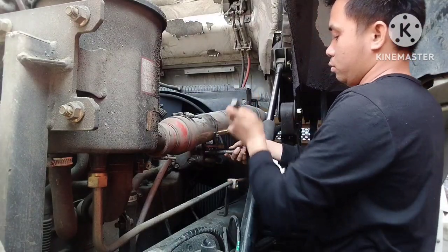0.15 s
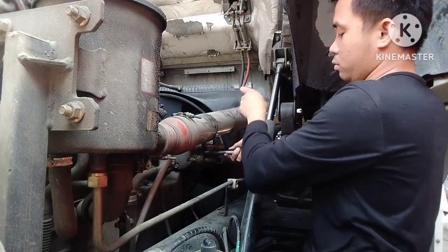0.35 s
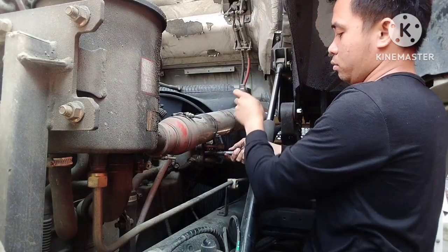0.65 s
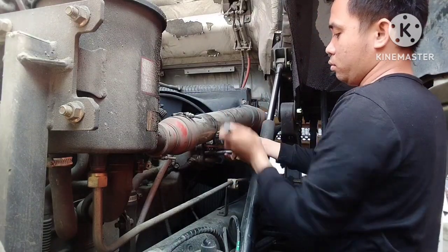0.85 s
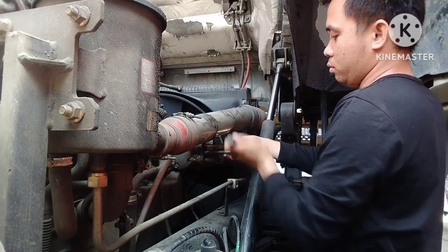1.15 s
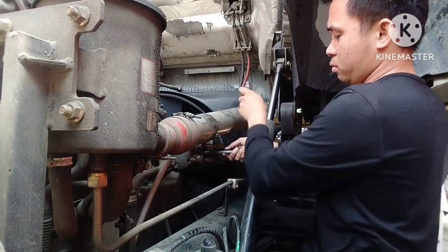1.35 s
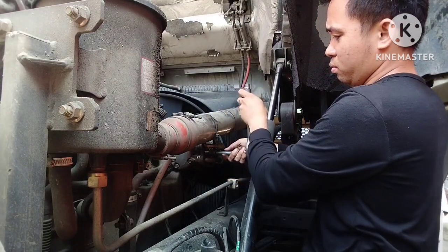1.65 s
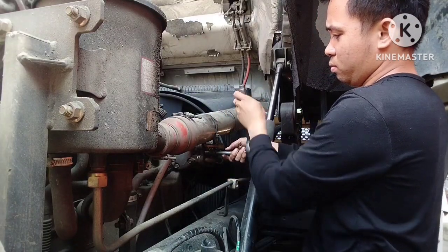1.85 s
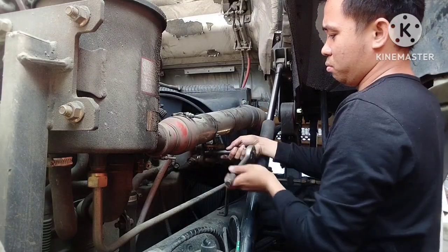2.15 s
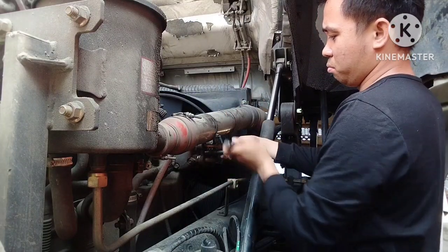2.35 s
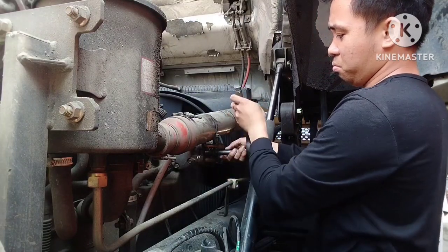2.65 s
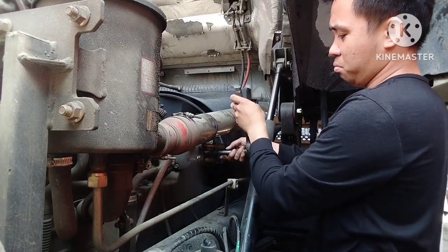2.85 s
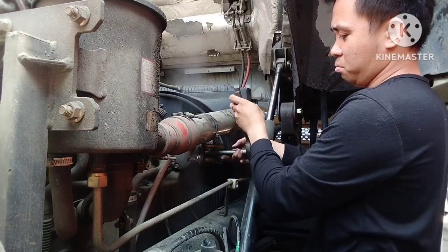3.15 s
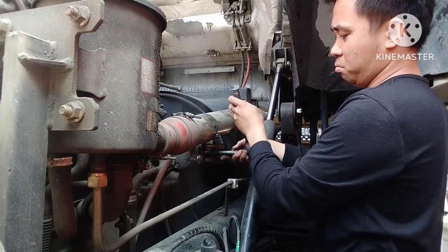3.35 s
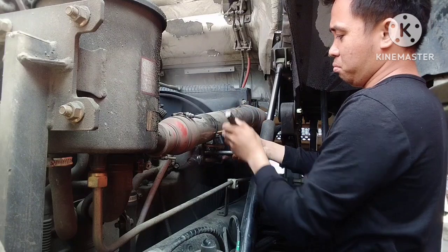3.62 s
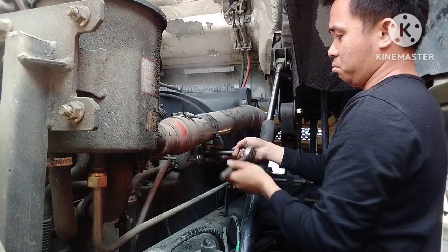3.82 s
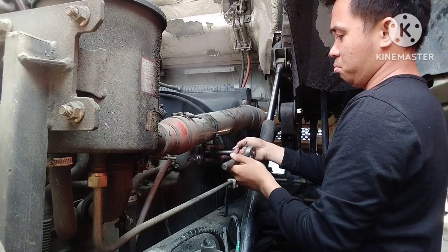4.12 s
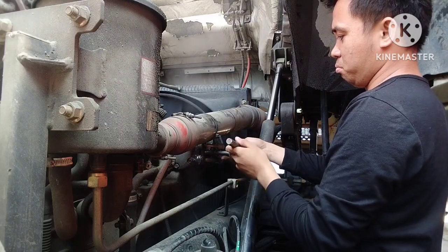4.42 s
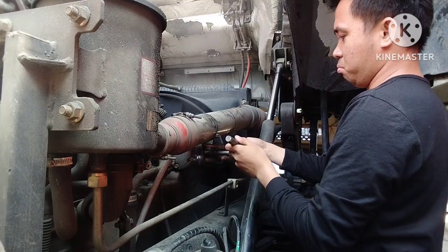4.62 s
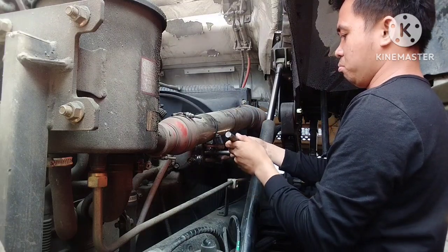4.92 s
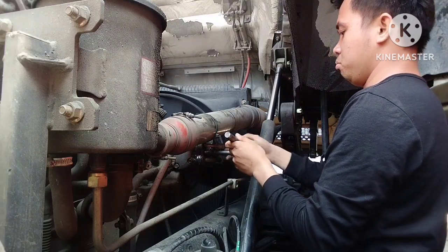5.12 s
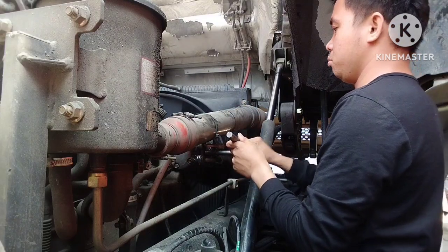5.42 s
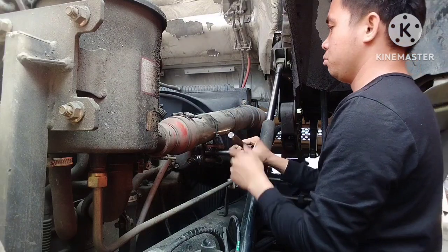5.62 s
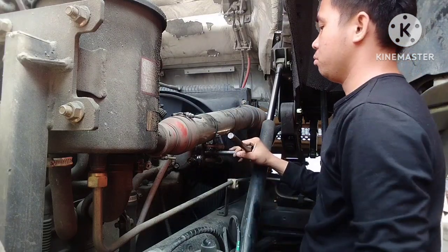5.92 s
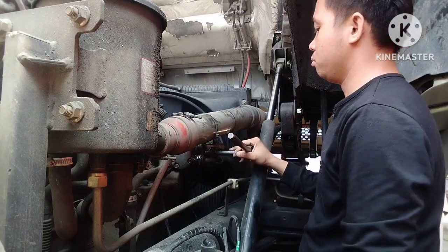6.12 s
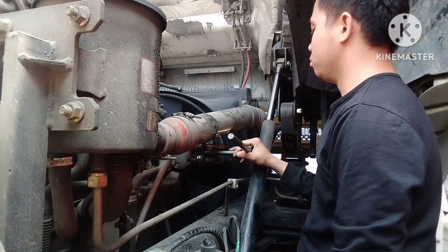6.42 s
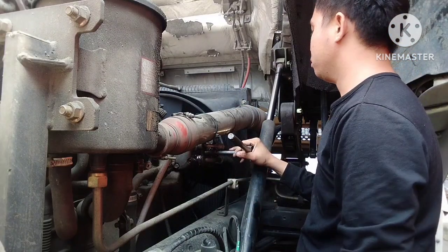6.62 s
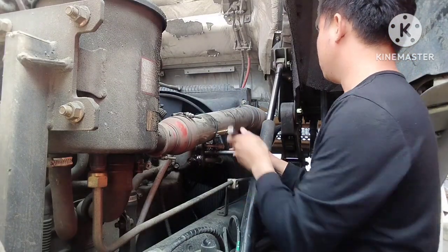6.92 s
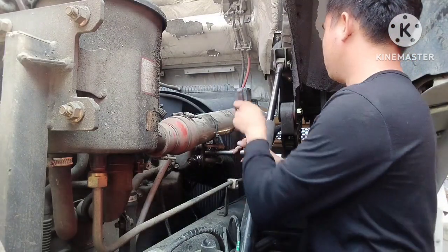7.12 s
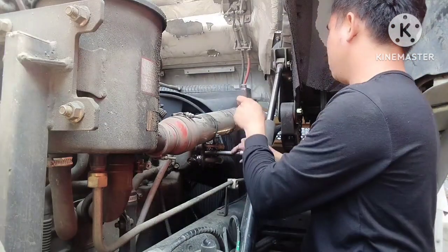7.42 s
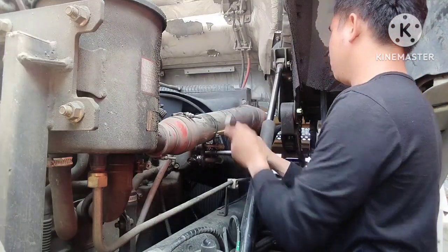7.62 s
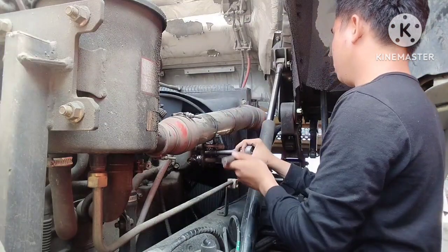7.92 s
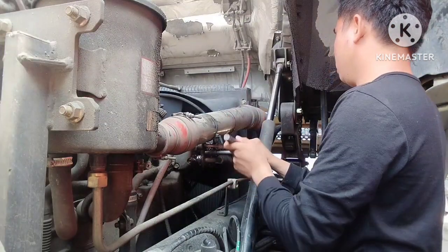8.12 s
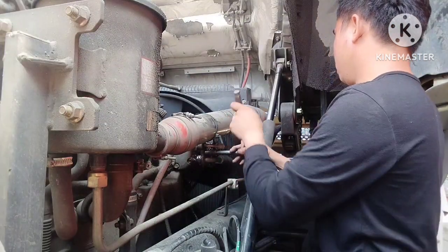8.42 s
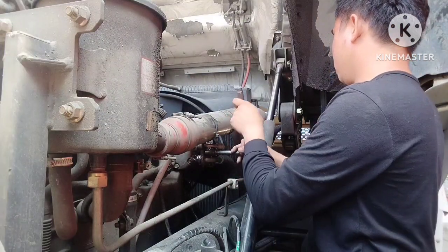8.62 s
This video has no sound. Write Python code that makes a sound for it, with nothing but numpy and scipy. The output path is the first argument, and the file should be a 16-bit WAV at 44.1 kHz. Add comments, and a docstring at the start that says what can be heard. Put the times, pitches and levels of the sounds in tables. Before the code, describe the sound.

A brief puff of escaping gas, a quick run of metallic ratchet clicks, then a loud steady pressurised hiss that lasts to the end.

```python
"""Faint pings and two faint clicks come first, over the low rumble and thin wash of a workshop.
A mechanic loosens a fitting on a vehicle's air conditioning line: a short puff of gas escapes,
a ratchet clicks back, then the gas jet hisses on, loud and steady. The jet is noise coloured mostly by
pipes and hollows; each click is a pawl that snaps and rings the wrench; the air is filtered noise.
A mono phone microphone hears it."""
import sys
import numpy as np
from scipy import signal
from scipy.fft import rfft, irfft, next_fast_len
from scipy.io import wavfile
from scipy.ndimage import uniform_filter1d

SR = 44100
rng = np.random.default_rng(int(sys.argv[2]) if len(sys.argv) > 2 else 0)


def wav_record(signal):
    """Record a signal, one row per channel, as 16-bit PCM in the file named by sys.argv[1]."""
    frames = np.transpose(np.atleast_2d(signal))
    bounded = np.clip(frames, -1, 1)
    # unit amplitude maps onto the largest positive 16-bit level
    quanta = np.round(bounded * 32767).astype(np.int16)
    wavfile.write(sys.argv[1], SR, quanta)


N = 386316  # samples

SIZE, HOP = 512, 128  # samples in one noise frame, and from one frame to the next
HZ = np.fft.rfftfreq(SIZE, 1 / SR)  # frequencies within a frame
T = np.arange(N // HOP + 5) * HOP / SR  # time of each frame in seconds
BODY_DB = -9  # usual level of the jet's lower body against its whistling top


def gain_of(db):
    """Turns decibels into amplitude."""
    return 10 ** (np.asarray(db) / 20)


def evened(x):
    """Scales to an rms (average strength) of 1."""
    return x / np.sqrt(np.mean(abs(x) ** 2) + 1e-20)


def read(points, hz):
    """Looks a table up on a log-frequency axis."""
    f, value = np.transpose(points)
    return np.interp(np.log(hz + 1), np.log(f + 1), value)


def add(mix, s, sound):
    """Mixes a sound in at s seconds."""
    part = mix[round(s * SR):][:len(sound)]
    part += sound[:len(part)]


def coloured(x, db_of_hz):
    """Filters by a gain given as a function of frequency."""
    size = next_fast_len(len(x))
    hz = np.fft.rfftfreq(size, 1 / SR)
    return irfft(rfft(x, size) * gain_of(db_of_hz(hz)), size)[:len(x)]


def bands(colour, splits, levels_db, extra_db=0):
    """Noise of one colour, split into bands that each follow their own level curve."""
    shape = gain_of(read(colour, HZ))
    band = np.searchsorted(splits, HZ)
    power = np.bincount(band, shape ** 2) * 2 / SIZE
    even_shape = shape / np.sqrt(power[band])
    # smoothing over neighbouring frequencies softens the seams between bands
    field_db = uniform_filter1d(np.array(levels_db)[band], size=3, axis=0) + extra_db
    a, b = rng.standard_normal((len(T), len(HZ), 2)).T
    z = (a + 1j * b) * even_shape[:, None] * gain_of(field_db)
    unit = np.sqrt(3 / SIZE)  # makes the overlapped frames sum to the asked rms
    return signal.istft(z * unit, nperseg=SIZE, noverlap=SIZE - HOP)[1][:N]


def jet():
    """Escaping gas is turbulent noise with drifting patches, flutter and spurts, coloured by the hollows."""
    # first short puff: start_s, whistling_top_db, lower_body_db (against the top)
    puff = [(0.22, -60, -18), (0.24, -41, -25), (0.38, -25, -10), (0.422, -24.5, -9.5), (0.43, -27, -4.5),
            (0.452, -24, -9.5), (0.48, -30, -11.5), (0.548, -54.5, -16), (0.6, -67, 0)]
    # the lasting jet: start_s, whistling_top_db, lower_body_db (against the top)
    blast = [(1.31, -72, -9), (1.324, -46, -26), (1.334, -35, -23), (1.36, -26.5, -8.5), (1.425, -21.5, -5),
             (1.445, -27, -9.5), (1.6, -26, -8.5), (2.1, -26.5, -8.5), (2.7, -25.5, -9.5),
             (3.4, -26.5, -8.5), (4.2, -26.5, -10), (4.9, -26.5, -9.5), (5.1, -28, -10.5),
             (6.14, -27.5, -10.5), (7.1, -29.5, -9), (7.4, -30.5, -8.5), (7.75, -28.5, -10),
             (8.3, -28.5, -11), (8.45, -27, -12.5), (8.76, -27.5, -13)]
    # a wider gap fills out all lower bands together; rows are wash, roar, lower body, upper body:
    # usual_db (against the top), slope_db (gained per dB that the lower body gains)
    filling = [(-23, 0.33), (-14.5, 0.88), (BODY_DB, 1), (-2.4, 0.34)]
    # colour of the hiss inside each band: pitch_hz, relative_db (per Hz)
    jet_colour = [(59, -55), (100, -28.5), (318, -15), (372, -14), (631, -19.5), (1230, -11.5), (1460, -16),
                  (1750, -15.5), (2170, -16), (3400, -10), (5230, -10.5), (5880, -11.5), (6620, -10),
                  (8880, 8), (10800, -13.5), (14000, -69), (22000, -120)]
    # borders between wash, roar, lower body, upper body and top: border_hz
    jet_splits = [1000, 2600, 4000, 7500]
    # spurts and sags, strongest in the treble: middle_s, lift_db, half_length_s
    spurt_rows = [(2.142, 2, .012), (2.178, 1.5, 0.024), (2.32, 1.5, 0.018), (2.41, -1, 0.047),
                  (2.526, 3, .02), (2.628, 5, 0.017), (4.108, 1, .02), (4.915, 1.5, .02),
                  (7.801, 5.5, 0.013), (7.844, -2, 0.051), (7.943, 1.5, .015), (7.982, -2, 0.048),
                  (8.1, 1.5, .04), (8.39, 0, .015)]
    # for a while a stretch of the hiss stands out or thins, likely as hands and body move near the leak:
    # middle_s, half_length_s, pitch_hz, half_width_hz, lift_db
    tint_rows = [(1.95, 0.29, 450, 400, 3), (2.3, 0.42, 1800, 600, 2.5), (4.2, 0.59, 5700, 700, 2.5),
                 (3.9, .8, 7700, 500, -1.5), (4.85, .2, 1300, 300, 2), (3.1, 0.68, 3240, 320, 1),
                 (7.8, .8, 4700, 400, 3), (8.1, .9, 6100, 350, -2), (6.4, .4, 7100, 200, 2)]
    # mostly bumps, where pipes and hollows ring with the jet:
    # pitch_hz, width_hz, lift_db (before the overall trim)
    hollows = [(380, 25, 2.5), (599, 20, 6.5), (733, 50, 2.5), (940, 15, 3.5), (1710, 30, 2),
               (1785, 92, 4.5), (2018, 75, 4.5), (2390, 43, 1), (3120, 75, 2.5), (3410, 64, 1.5),
               (3394, 26, 5), (3460, 51, 1), (4284, 80, 4.5), (4550, 33, 5.5), (4580, 60, -4.5),
               (5020, 38, 0), (5120, 48, 3.5), (5396, 52, 6.5), (6480, 89, 3), (6250, 60, 2), (6650, 57, 5),
               (6690, 84, 4), (6990, 58, 6), (7330, 46, 2), (7720, 70, 0.5), (7850, 59, -0.5),
               (8100, 78, 1.5), (8900, 98, 1), (9360, 150, 4)]
    # mostly notches, where reflections off the engine bay cancel the direct sound:
    # pitch_hz, width_hz, lift_db (before the overall trim)
    notches = [(637, 53, -4), (980, 40, -3), (1480, 49, -3), (1930, 36, -3), (3450, 53, -0.5),
               (3830, 69, -4), (4400, 40, 2), (4500, 40, -3.5), (5950, 45, -2.5), (6300, 44, -2),
               (6780, 60, -2), (7440, 59, -6.5), (8500, 81, -5)]
    trim_db = -0.8

    s, top, body = np.transpose(puff + blast)
    between = (T > puff[-1][0]) & (T < blast[0][0])
    shut = (T < s[0]) | between
    top_db = np.where(shut, -120, np.interp(T, s, top))
    gained = np.interp(T, s, body) - BODY_DB
    levels = [top_db + usual_db + slope * gained for usual_db, slope in filling] + [top_db]

    noise = rng.standard_normal((len(T), len(HZ))).T
    patches = evened(uniform_filter1d(uniform_filter1d(noise, size=4, axis=0), size=12, axis=1))
    flutter = evened(uniform_filter1d(rng.standard_normal(len(T)), size=4))
    spurts = sum(db * np.exp(-((T - at) / length) ** 2) for at, db, length in spurt_rows)
    treble = np.clip(HZ / 8000, 0, 1)[:, None]  # flutter and spurts live mostly in the treble
    tints = 0
    for at, half, f, width, db in tint_rows:
        tints = tints + db * np.exp(-((HZ[:, None] - f) / width) ** 2 - ((T - at) / half) ** 4)
    extra_db = tints + 0.51 * patches + treble * (0.19 * flutter + spurts)
    hiss = bands(jet_colour, jet_splits, levels, extra_db)

    def resonance_db(hz):
        """Adds up the bumps and notches around the leak."""
        return trim_db + sum(db / (1 + (2 * (hz - f) / w) ** 2) for f, w, db in hollows + notches)

    return shifting_ripple(coloured(hiss, resonance_db), depth_db=2.05)


def shifting_ripple(x, depth_db):
    """Fine reflections colour the sound and shift slowly as the mechanic moves."""
    z = signal.stft(x, nperseg=2048)[2]
    noise = rng.standard_normal(z.shape[::-1]).T
    ripple = evened(uniform_filter1d(uniform_filter1d(noise, size=3, axis=0), size=40, axis=1))
    return signal.istft(z * gain_of(depth_db * ripple), nperseg=2048)[1][:N]


def tooth(db, swing, pawl_hz, pawl_db, rattle):
    """The pawl rattles and snaps at once, and its rattle rings the wrench's modes (its own pitches)."""
    # modes of the wrench: pitch_hz, relative_db (before scatter and group levels), t60_s (time to fall 60 dB)
    wrench = [(2360, -5, 0.073), (2700, -22, 0.15), (2900, -22, 0.1), (3100, -16, 0.04), (3270, 2, 0.085),
              (3550, -18, 0.099), (3500, -13, 0.1), (4300, -6, 0.12), (5222, -9, 0.14), (5450, -16, 0.18),
              (6158, -34, 0.09), (6670, 10, 0.041), (7106, -17, 0.072), (7440, -23, 0.18), (8500, -2, 0.1),
              (9367, -16, 0.076), (9572, -16, 0.073), (9700, -6.5, 0.049), (1750, -18, .06),
              (2010, -4, .06), (4420, -4, 0.086), (5850, -14, .07), (8250, -5, .06), (9000, -8, .04)]
    # broad snap of the pawl: pitch_hz, relative_db (per Hz)
    snap_colour = [(1000, -44), (1700, -13), (2600, -15), (3300, -2.5), (5000, -7), (6600, -3), (7600, -7),
                   (8600, 5.5), (10500, -24)]
    # borders between the groups of modes: border_hz
    tooth_edges = [1500, 2700, 3800, 4900, 6200, 7400, 9000, 10800]
    # level of each group of modes, low to high: swing_start_db, swing_end_db
    groups = [(-17.5, -16.5), (-10.5, -3.5), (-4, -8), (-4, -11), (0, 0), (-7, -2.5), (-15, -10)]
    scatter_db = 4  # each tooth strikes the modes a little differently

    t = np.arange(SR // 5) / SR
    shake, hiss = rng.standard_normal((2, len(t)))
    blow = shake * np.exp(-t / max(rattle, 5e-4))
    modes = 0
    for f, mode_db, t60 in wrench + [(pawl_hz, 4, .11)]:
        struck_db = mode_db + scatter_db * rng.standard_normal()
        modes = modes + gain_of(struck_db - 60 * t / t60) * np.sin(2 * np.pi * f * t)
    ring = evened(signal.fftconvolve(blow, modes)[:len(t)])

    held = np.maximum(t - 0.93 * rattle, 0)  # the near snap holds about as long as the rattle
    near, echo = gain_of(-60 * held / 0.046), gain_of(-11 - 60 * t / 0.21)  # echo of the shop
    onset = np.minimum(t / .0004, 1)
    snap = evened(coloured(hiss, lambda hz: read(snap_colour, hz)) * (near + echo) * onset)
    x, out = ring + gain_of(-1.0) * snap, 0

    # the grip and angle of the wrench decide how strongly each group of modes speaks
    for lo, hi, (first_db, last_db) in zip(tooth_edges, tooth_edges[1:], groups):
        part = signal.sosfilt(signal.butter(3, [lo, hi], "band", fs=SR, output="sos"), x)
        part_peak = np.sqrt(uniform_filter1d(part ** 2, size=300).max())
        group_db = first_db + swing * (last_db - first_db) + pawl_db * (lo < pawl_hz < hi)
        out += gain_of(group_db) * part / part_peak
    return gain_of(db) * out / np.sqrt(uniform_filter1d(out ** 2, size=200).max())


def tools():
    """Ratchet teeth click, and soft pings are short sine tones that swell and fade."""
    # ratchet teeth: start_s, level_db (highest short-time rms), swing (handle, 0-1), pawl_hz,
    # pawl_db (lift of the group of modes that holds the pawl's ring), rattle_s (time constant)
    teeth = [(0.1344, -53, 0.5, 6660, -2, 0.004), (0.191, -50, 0.4, 6640, -1.5, 0.004),
             (0.9128, -26.5, 0, 6820, 0, 0.0027), (0.96, -23.5, 0.3, 6740, 2, 0.0037),
             (1.0066, -23.5, 0.45, 6570, 3, 0.0029), (1.05, -23.5, 0.8, 6560, 0, 0.0044),
             (1.097, -26, 0.95, 6620, -5, 0.0053), (1.1564, -32, 0.7, 6580, -5, 0.0026)]
    # faint soft pings, whistles, one low thump and three faint ratchet clicks ringing near 4.3 kHz: start_s,
    # length_s, pitch_hz, peak_db
    pings = [(0.014, 0.026, 2630, -43), (.03, 0.04, 1320, -50), (.58, 0.18, 4680, -70),
             (0.7, 0.15, 4620, -63), (.74, 0.13, 3150, -67), (1.432, 0.014, 300, -37),
             (7.155, .03, 4300, -39), (7.197, 0.027, 4300, -37), (7.255, .03, 4300, -37)]
    out = np.zeros(N)
    for s, *strike in teeth:
        add(out, s, tooth(*strike))
    for s, length, hz, db in pings:
        t = np.arange(round(length * SR)) / SR
        add(out, s, gain_of(db) * np.hanning(len(t)) * np.sin(2 * np.pi * hz * t))
    return out


def air():
    """Workshop air is a low noise rumble with a narrow wavering drone, and a thin wash of noise."""
    # levels over time: start_s, rumble_db, low_wash_db, high_wash_db
    air_levels = [(0.0, -52, -49, -51), (0.26, -57, -51, -57), (0.41, -54, -54, -51),
                  (0.52, -54.5, -58.5, -58.5), (0.8, -54.5, -60, -61.5), (1.43, -56, -51, -59),
                  (1.47, -64, -57, -63), (2.5, -67, -57.5, -61), (5.7, -64, -61, -62),
                  (8.76, -66, -69, -62)]
    # colour of the wash inside each band: pitch_hz, relative_db (per Hz)
    air_colour = [(120, -40), (200, -3.5), (353, -17), (563, -14), (643, -15.5), (699, -14), (1100, -20),
                  (1390, -20), (3650, -24.5), (4690, -22.5), (6230, -28.5), (9140, -24.5), (10800, -44),
                  (14000, -74), (22000, -120)]
    # colour of the rumble: pitch_hz, relative_db (per Hz)
    rumble_colour = [(12, -32), (20, -3), (32, -4), (45, 0), (128, -3), (178, -13), (205, -18), (237, -17),
                     (250, -19), (320, -47), (550, -120)]
    # wavering drone: pitch_hz, width_hz, level_db (against the rumble, before it sinks)
    hum = (36.6, 5, -9)
    # the drone sinks: start_s, end_s, change_db
    hum_fade = (1.5, 2.6, -10)

    s, rumble_db, *wash_db = np.transpose(air_levels)
    t = np.arange(N) / SR
    rumble = evened(coloured(rng.standard_normal(N), lambda hz: read(rumble_colour, hz)))
    hum_hz, width, hum_db = hum
    drone = evened(coloured(rng.standard_normal(N),
                            lambda hz: -20 * np.log10(1 + (2 * (hz - hum_hz) / width) ** 2)))
    drone_db = hum_db + np.interp(t, hum_fade[:2], [0, hum_fade[2]])
    low = (rumble + gain_of(drone_db) * drone) * gain_of(np.interp(t, s, rumble_db))
    return low + bands(air_colour, [2500], [np.interp(T, s, db) for db in wash_db])


def scene():
    """One microphone feeds both channels."""
    return np.tile(jet() + tools() + air(), (2, 1))


def low_pass(x, hz):
    """Cuts steeply above hz."""
    return signal.oaconvolve(x, signal.firwin(1535, hz, window=("kaiser", 10), fs=SR), "same")


def record(dry):
    """Sound ends steeply near a quarter of the sample rate; a faint mirror image sits above it."""
    # gain of the treble's mirror image: pitch_hz, gain_db
    sheen = [(12300, -80), (12600, -46), (14300, -29), (15400, -32)]
    edge_hz, sheen_edge_hz = 10850, 15550
    main = low_pass(dry[0], edge_hz)
    flipped = main * (-1.) ** np.arange(N)  # flipping every other sample turns the spectrum upside down
    mirror = coloured(flipped, lambda hz: read(sheen, hz))
    return np.tile(low_pass(main + mirror, sheen_edge_hz), (2, 1))


dry = scene()
out = record(dry)
wav_record(out)
```